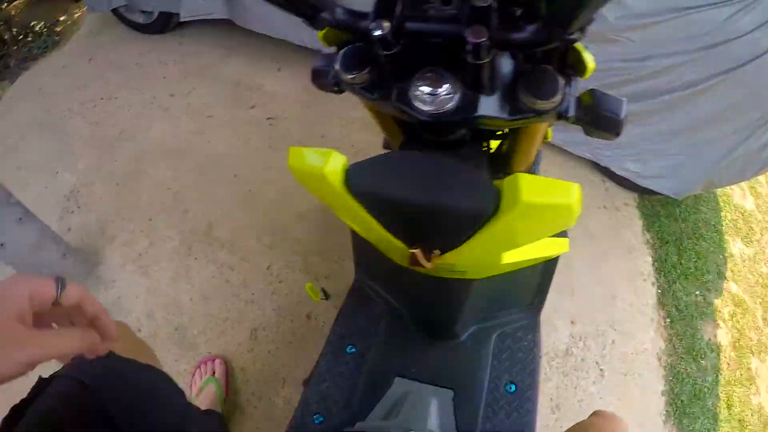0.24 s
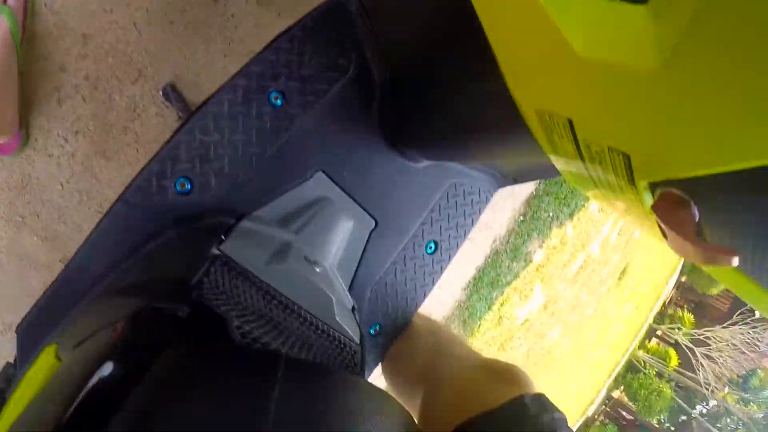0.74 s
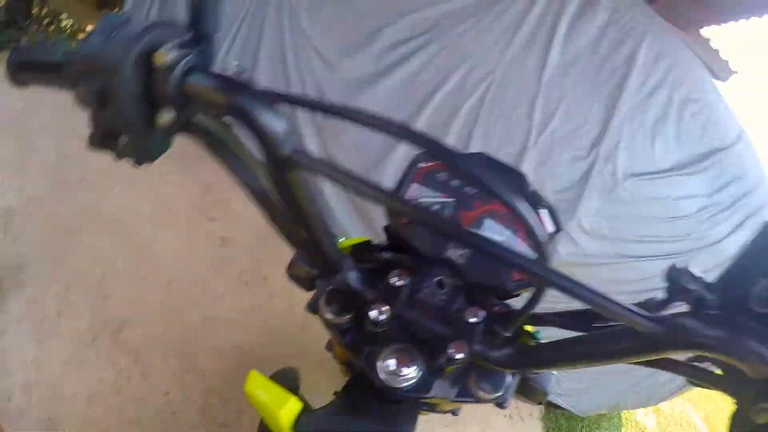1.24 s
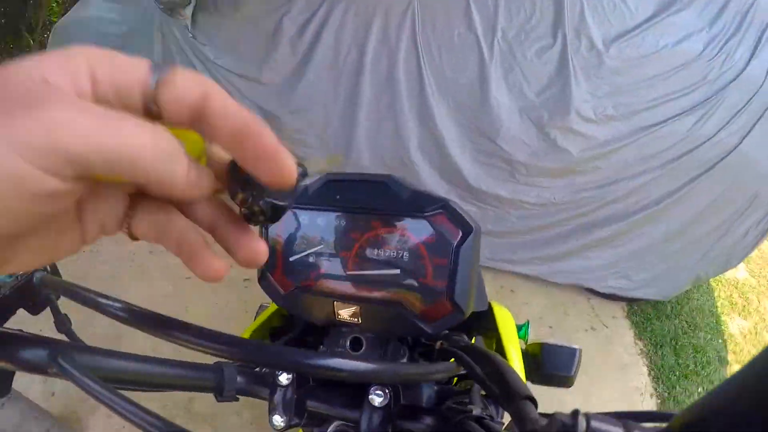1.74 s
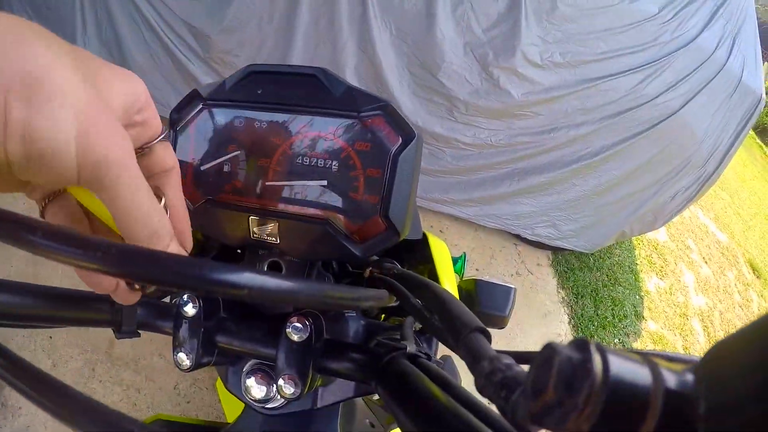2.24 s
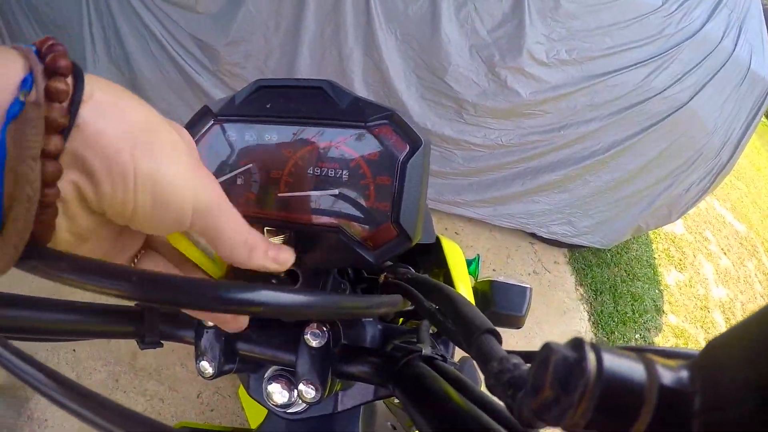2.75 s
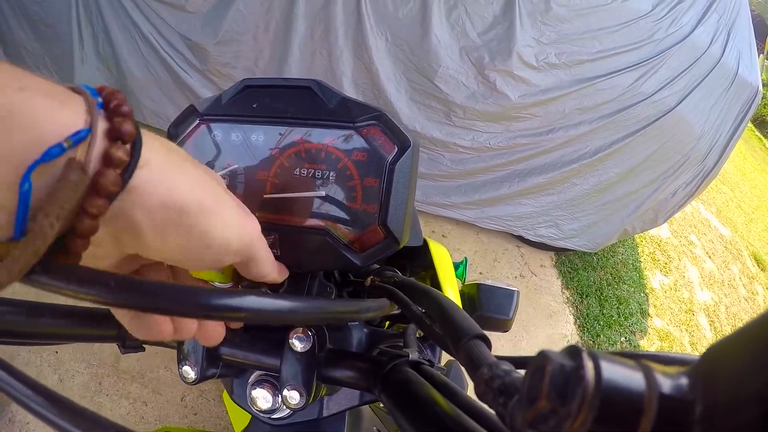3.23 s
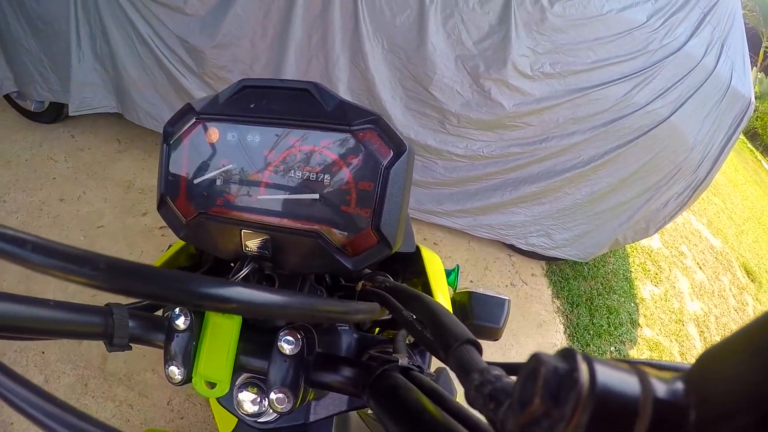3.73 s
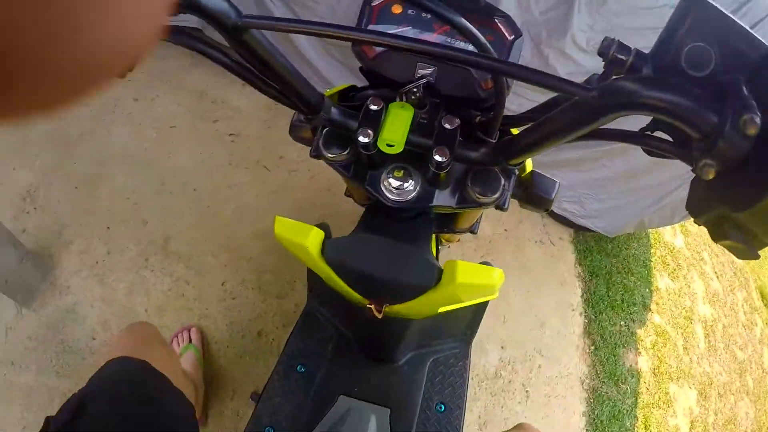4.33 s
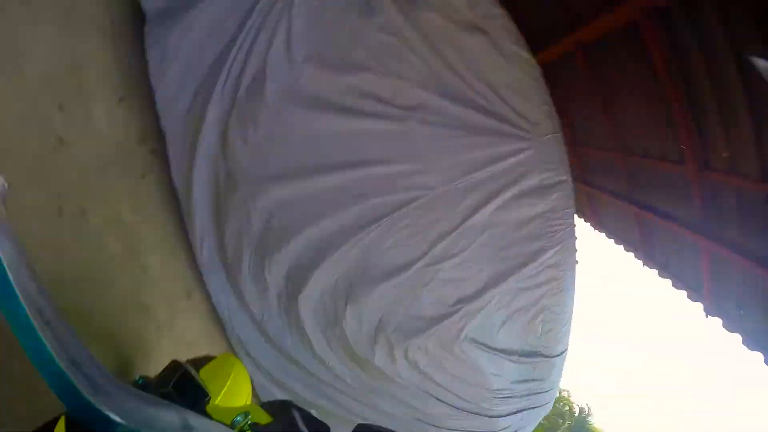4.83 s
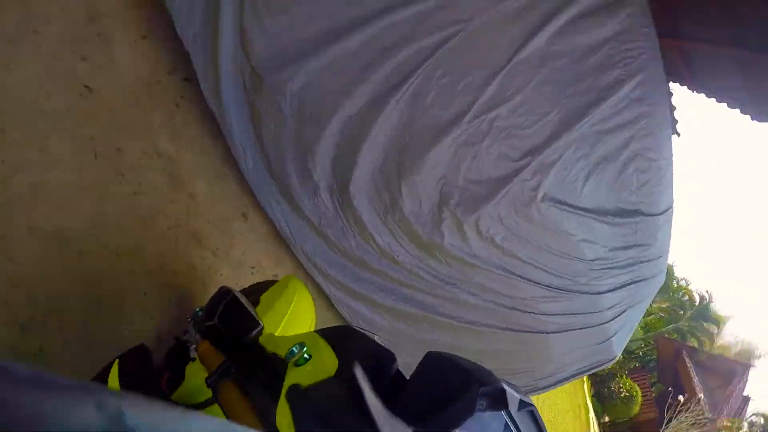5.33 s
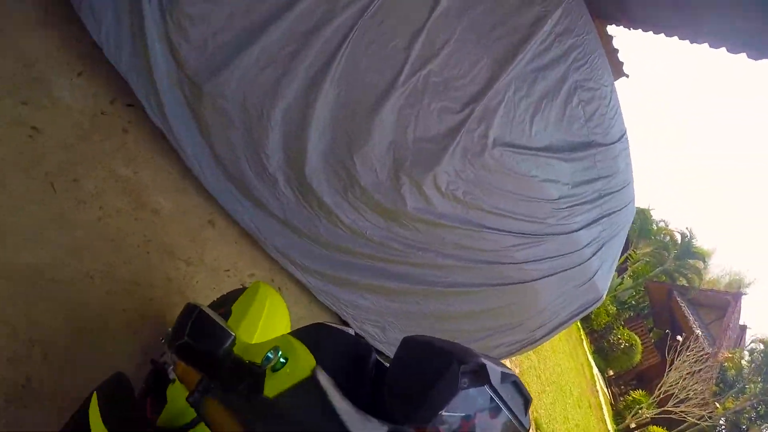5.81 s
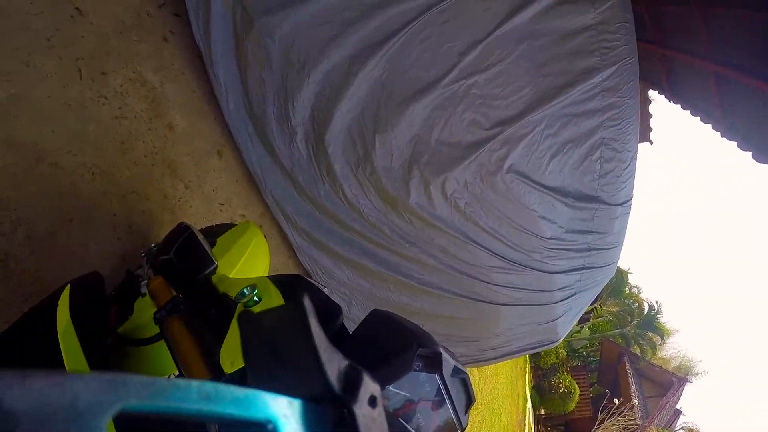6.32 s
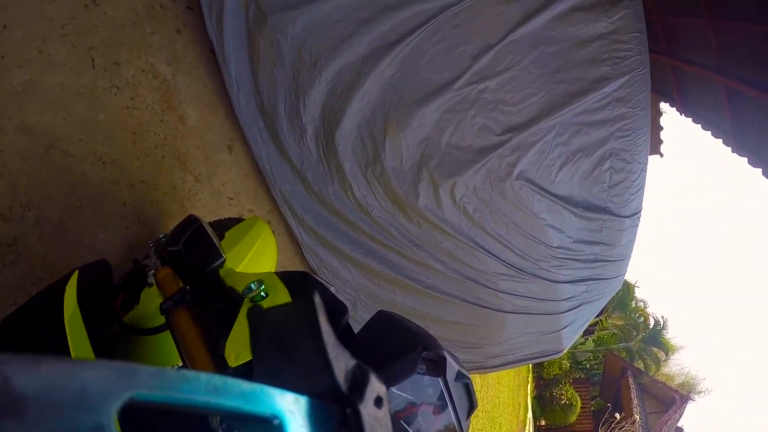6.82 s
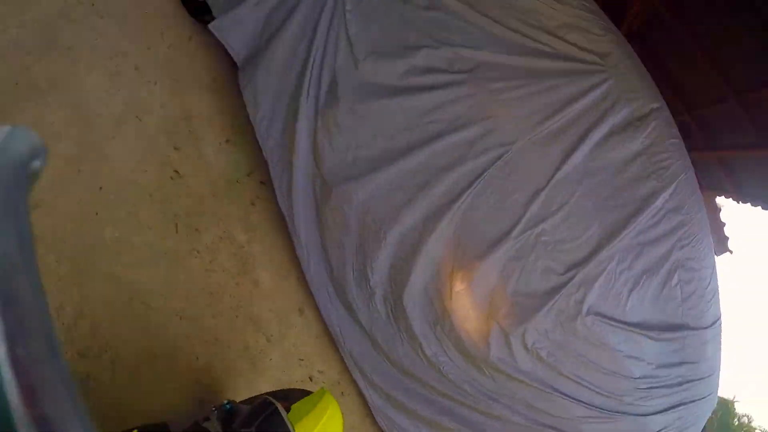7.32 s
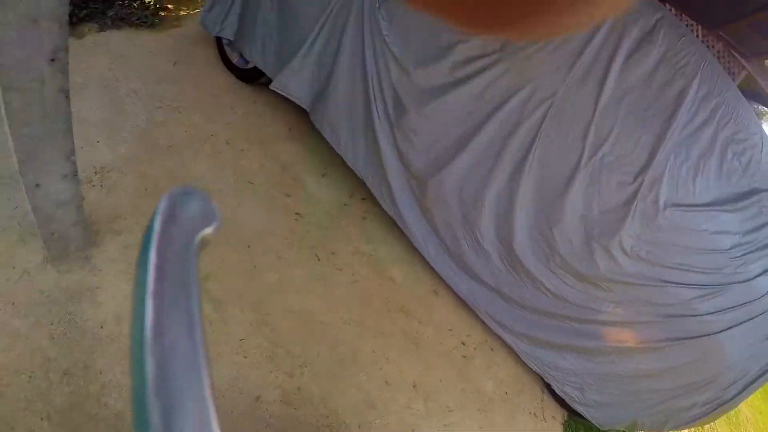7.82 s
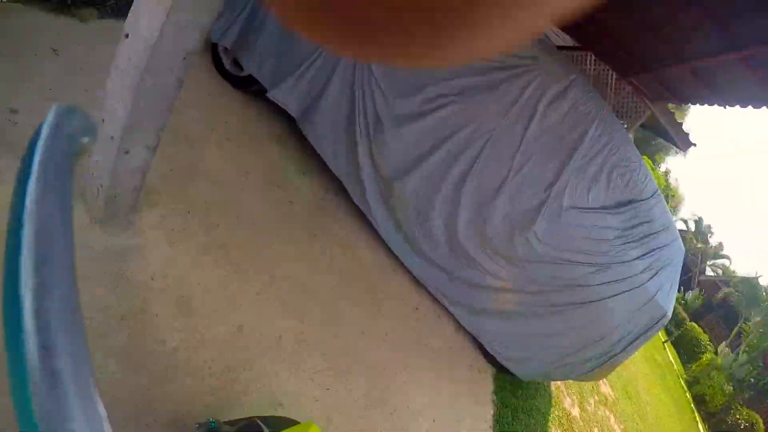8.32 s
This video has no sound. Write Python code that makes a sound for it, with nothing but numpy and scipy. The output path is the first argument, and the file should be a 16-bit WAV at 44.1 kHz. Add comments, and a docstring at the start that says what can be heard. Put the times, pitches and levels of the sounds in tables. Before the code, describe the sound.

In a quiet yard a parked motorbike's side stand snaps up with a brief metallic clack. Keys jingle thinly and click in the lock, followed by another light jingle. Then a hand grabs the body-worn camera: dry plastic ticks, short finger scrapes, dull low bumps and a light hissing slide, all very close, over swelling low rumble on the microphone.

```python
"""In a yard, a rider kicks up the side stand of a parked motorbike, engine off, and works a jingling key
into the lock; then a hand rubs, ticks, bumps and slides on the case of a small body-worn camera.
Impacts are decaying noise bursts in body spectra and resonances; keys also ring as damped sines.
Friction is noise with random slips and snags; bumps are short low-frequency pulses.
Air and movement rumble on the microphone, more strongly once the camera is held."""
import sys
import numpy as np
from scipy import signal
from scipy.fft import rfft, irfft, next_fast_len
from scipy.io import wavfile
from scipy.ndimage import uniform_filter1d

SR = 44100
rng = np.random.default_rng(int(sys.argv[2]) if len(sys.argv) > 2 else 0)


def pcm_store(signal):
    """Save signal as 16-bit PCM."""
    levels = np.round(np.clip(np.atleast_2d(signal), -1, 1) * 32767)
    wavfile.write(sys.argv[1], SR, levels.astype(np.int16).T)


N = 377496

# Table levels are relative: source gains and body resonances act on them afterwards.
# Side stand and footboard clack: start_s, level_db, bass_db, treble_db
STAND_HITS = [(0.0763, -46.5, -3, 11), (0.0837, -44.5, 7, -2), (0.0882, -40.5, -7.5, 3),
              (0.1488, -54.5, -1.5, -6), (0.1801, -61.5, -2, 1), (0.1983, -58, -9, -14),
              (0.2067, -62.5, -4, 1), (0.2263, -64, -5, -2), (0.7305, -62, -16, -11)]
# Key tapping at the lock and riding over its wafers: start_s, level_db, bass_db, treble_db
LOCK_CLICKS = [(1.8394, -45, 8, -7), (1.8643, -52, -2, -5), (1.8734, -49, -12, 7), (2.1499, -56.5, 2, 5),
               (2.276, -60, -17, 4), (2.3583, -62.5, 4, 0), (2.4411, -60.5, 5, -6), (2.5682, -58, 9, 11),
               (2.6287, -67.5, 7, -14), (2.6574, -58, -2, -2), (2.772, -61.5, 9, -2), (2.7983, -65.5, 6, 2),
               (3.1389, -53, 4.5, -3), (3.249, -63, 14.5, -2), (3.3725, -57.5, 1, -8),
               (3.4733, -51.5, 4.5, 6)]
# Keys touching on their ring, in three jingles: start_s, clink_level_db, ring_pitch_hz, ring_level_db
KEY_TOUCHES = [(0.3114, -58, 5770, -72), (0.325, -65, 13500, -64), (0.3667, -62.5, 14600, -70),
               (0.4185, -66.5, 8480, -76), (0.444, -71, 10100, -64), (0.8525, -62.5, 6140, -67),
               (0.9, -69, 5960, -62), (0.913, -71, 13440, -53), (3.567, -70.5, 10950, -76),
               (3.5984, -67, 11300, -65), (3.6327, -65.5, 13700, -83), (3.6514, -58, 4420, -71),
               (3.6629, -65, 10800, -60), (3.6796, -76, 6600, -76), (3.706, -70, 10700, -71)]
# Ticks of the camera case and mount: start_s, level_db, bass_db, treble_db
CASE_TICKS = [(1.37, -44, -12, -5), (1.4334, -46.5, -7.5, -6.5), (4.1721, -44, -12.5, -5),
              (4.273, -41, -6, -20), (4.3754, -42, -5, -19), (4.4796, -50.5, 2, -10),
              (4.7158, -41, -10, -1), (4.7336, -41, -9.5, -4), (4.9563, -38.5, -2, -14), (5.151, -56, 9, 2),
              (5.178, -52, 7, -33), (5.2111, -45.5, 5.5, -29), (5.237, -52, 19, 0), (5.2586, -49.5, 8, -10),
              (5.8414, -40, -6.5, 4), (7.29, -39.5, -19, 7), (7.3234, -32, -15.5, -2),
              (7.337, -34, -12.5, -12), (7.372, -50.5, -12, -5), (7.6238, -38, -10, -11),
              (7.689, -31.5, -10.5, -2), (7.724, -41, -12, 4), (7.9331, -45.5, 1.5, 3),
              (8.1314, -33, -5.5, 13), (8.1722, -50, -13, 8), (8.2396, -39.5, -12, -3)]
# Finger strokes on the case: start_s, length_s, level_db, treble_db
FINGER_STROKES = [(1.319, 0.1, -63, 3), (1.418, 0.16, -76, 8), (4.137, 0.028, -65, -4),
                  (4.254, 0.019, -51, 6), (4.275, 0.036, -48, 4), (4.364, 0.033, -44, 2),
                  (4.46, 0.24, -56, -7), (4.566, 0.064, -43, -3), (4.643, 0.037, -55, 1),
                  (4.73, 0.049, -46.5, 7), (4.785, 0.052, -60, 11), (4.953, 0.066, -54.5, 9),
                  (5.013, .03, -46.5, 3), (5.144, 0.022, -58, 6), (5.216, 0.026, -62, 2),
                  (5.308, 0.0091, -58.5, 4), (5.389, 0.091, -58, 7.5), (5.532, 0.02, -63, -1),
                  (5.575, 0.038, -59, -1), (5.843, 0.036, -43.5, -5.5), (5.883, 0.1, -61, -9),
                  (6.059, 0.074, -58, -5), (6.138, 0.11, -61.5, -1.5), (7.207, 0.024, -32, 3),
                  (7.266, .026, -68, -14), (7.298, 0.05, -56, 2), (7.438, 0.033, -44, 2),
                  (7.482, 0.026, -47, 13), (7.565, .052, -48, 9), (7.655, 0.054, -54, -9),
                  (7.777, 0.024, -53, 8), (7.912, 0.06, -55.5, -7), (8.108, 0.03, -52, -5),
                  (8.234, 0.032, -49, 7), (8.297, 0.061, -45.5, 0.5), (8.37, 0.062, -49.5, 2.5)]
# Soft bumps on the camera: start_s, level_db, pitch_hz
SOFT_BUMPS = [(1.365, -44, 87), (1.435, -39, 54.4), (1.74, -35.5, 51.3), (1.916, -41.5, 56),
              (2.772, -54, 121), (3.172, -49, 86), (4.277, -32, 67), (4.304, -33, 76), (4.573, -31.5, 139),
              (4.715, -27.5, 122), (4.735, -32.5, 75), (5.002, -21, 94), (5.019, -20, 85),
              (5.077, -38, 131), (5.857, -30.5, 75), (5.964, -26, 79), (6.081, -27, 86),
              (6.112, -27.5, 83.5), (6.168, -24, 99), (6.877, -23, 66.4), (7.173, -27, 85),
              (7.29, -22.5, 81), (7.726, -29.5, 109), (8.028, -30.5, 98), (8.179, -21, 111),
              (8.321, -25.5, 73)]
# Harder fingertip knocks, a softer contact having a lower edge: start_s, peak_db, edge_hz
FINGER_KNOCKS = [(4.4633, -45, 1490), (5.386, -46.5, 2170), (5.966, -42.5, 1740), (6.062, -49, 910),
                 (6.0801, -32, 705), (6.168, -38, 1820), (6.891, -44.5, 900), (7.175, -37, 2260),
                 (8.077, -44, 2200), (8.2902, -38, 1820)]
# One long, light slide, then moments of firm pressure that replace its level: start_s, length_s, level_db
SLIDE_PRESSURE = [(6.402, 0.85, -62), (6.399, 0.038, -48), (6.461, .11, -51), (6.598, 0.091, -52.5),
                  (6.741, 0.048, -50), (7.152, 0.046, -48)]
# Air and movement on the microphone: time_s, level_db
MOVEMENT_LEVEL = [(0.0, -51), (0.16, -62), (1.02, -63.5), (1.64, -56), (2.17, -65.5), (2.93, -68),
                  (3.86, -64.5), (4.43, -48), (4.89, -49.5), (5.6, -56.5), (5.87, -52.5), (6.05, -40.5),
                  (6.56, -50), (6.79, -44), (7.01, -33.5), (7.41, -47.5), (8.34, -43.5), (8.56, -41)]
# Light, constant friction of the holding hand: time_s, level_db
GRIP_LEVEL = [(1.1, -89), (1.35, -78.5), (1.6, -92), (4.0, -91), (4.5, -69), (4.9, -75.5), (5.7, -79),
              (6.3, -85.5), (7.2, -64.5), (7.4, -72), (8.1, -66.5), (8.56, -70.5)]

# Spectra of the struck and rubbed bodies, and of the air: frequency_hz, gain_db
STAND_SPECTRUM = [(200, -16), (470, -5.5), (800, 2), (1300, -0.5), (1700, -7.5), (2300, -7.5), (3000, -7.5),
                  (4200, -4), (6000, -8.5), (8500, -18.5), (11000, -21.5), (15000, -21.5)]
LOCK_SPECTRUM = [(200, -33), (700, -18), (1000, -17.5), (1400, -8.5), (1800, -9.5), (2500, -1), (3300, 1),
                 (4500, 9), (6800, -3.5), (8500, -0.5), (11000, -4.5), (15000, -8.5)]
KEY_SPECTRUM = [(200, -23), (2000, -21), (4000, -1), (5200, -2), (6500, 0), (9500, -7), (11000, -3),
                (12300, -11), (15000, -10)]
TICK_SPECTRUM = [(200, 15.5), (600, -4.5), (1100, -5), (1700, 3), (2800, -8.5), (4000, -3.5), (5200, 0),
                 (6500, -10), (8200, -14), (10000, -16.5), (12500, -23), (15000, -15.5)]
RUB_SPECTRUM = [(200, 16.5), (600, -4), (1100, -4.5), (1800, 2), (2800, 1), (3600, 4.5), (4800, 3.5),
                (6500, 1.5), (8200, -7), (9800, -7), (11200, -6.5), (12700, -7.5), (15000, -9)]
SLIDE_SPECTRUM = [(300, -32), (950, -9), (1300, -17.5), (2200, -7), (3000, -9), (3400, 1), (4200, -6.5),
                  (5700, -1), (6000, 2.5), (7200, 1), (7900, -13.5), (8600, -8), (9900, -15), (15500, -19)]
GRIP_SPECTRUM = [(300, -21.5), (900, -11.5), (2200, -5), (2900, -4.5), (3500, 4.5), (4500, -4.5),
                 (6700, -3), (9500, -16.5), (15500, -16)]
KNOCK_SPECTRUM = [(40, -28.5), (150, -4.5), (330, 4.5), (620, 0), (900, -5), (1600, -5), (3000, 0.5)]
RUMBLE_SPECTRUM = [(15, -11), (35, 1), (55, 3.5), (80, -0.5), (120, -11.5), (180, -23), (300, -36),
                   (600, -63), (1300, -78.5)]
YARD_SPECTRUM = [(40, -21.5), (75, -3.5), (130, -18.5), (296, -25), (650, -31.5), (1270, -35), (1830, -38),
                 (4550, -40), (13500, -42), (16000, -48)]

# Resonances of the lock barrel, the camera case and the side stand: pitch_hz, width_hz, gain_db
LOCK_RESONANCES = [(1343, 160, 7), (2030, 160, 5), (2550, 110, 7.5), (4280, 100, -31), (6850, 180, 11)]
CASE_RESONANCES = [(1870, 190, -7), (2330, 490, -8), (3616, 190, -16.5), (4490, 300, -12), (5180, 180, -15),
                   (6010, 87, -5), (7150, 67, 1), (8400, 420, 2.5), (11100, 100, 1)]
STAND_RESONANCES = [(1740, 370, 7), (4000, 200, 3), (5600, 200, -8), (6850, 350, 4), (8600, 450, 5.5),
                    (11100, 350, -3)]

# Anchors of the tonal lean, for bass, middle and treble: frequency_hz
LEAN_HZ = (1300, 4700, 12000)


def from_db(db):
    """Decibel law: an amplitude ratio is ten to the power of dB over twenty."""
    return 10 ** (np.asarray(db) / 20)


def rms_one(x):
    """Power normalisation: scale the root mean square to one."""
    return x / np.sqrt(np.mean(x ** 2) + 1e-20)


def seconds(length):
    """Sampled time: the instants, in seconds, of a given length."""
    return np.arange(int(length * SR)) / SR


def level(rows):
    """Envelope: gain over the whole scene, interpolated in decibels between (time_s, level_db) rows."""
    times, levels_db = np.transpose(rows)
    return from_db(np.interp(np.arange(N) / SR, times, levels_db))


def add(out, start_s, sound):
    """Superposition: sum a sound into the mix from its starting time."""
    at = max(0, int(start_s * SR))
    out[at:at + len(sound)] += sound[:max(0, N - at)]


def flutter(n, knots_hz):
    """Random modulation: straight lines between normal random values, knots_hz of them a second."""
    knots = rng.standard_normal(2048)
    position = np.arange(n) * knots_hz / SR % 2047
    return np.interp(position, np.arange(2048), knots)


def colour(x, spectrum, bass_db=0, treble_db=0):
    """Minimum-phase filtering: a causal body response follows from its log spectrum by the cepstrum."""
    n = 2 * next_fast_len(len(x) // 2 + 512)
    log_hz = np.log(np.arange(n // 2 + 1) * SR / n + 1)
    spectrum_hz, spectrum_db = np.transpose(spectrum)
    body_db = np.interp(log_hz, np.log(spectrum_hz), spectrum_db)
    lean_db = np.interp(log_hz, np.log(LEAN_HZ), [bass_db, 0, treble_db])
    cepstrum = irfft(np.log(from_db(body_db + lean_db)))
    # fold the cepstrum onto positive time
    cepstrum[1:n // 2] *= 2
    cepstrum[n // 2 + 1:] = 0
    response = np.exp(rfft(cepstrum))
    return irfft(rfft(x, n) * response)[:len(x)]


def resonate(x, modes):
    """Modal resonance: add to x the response of two-pole resonators whose damping sets their width."""
    out = x.copy()
    for pitch_hz, width_hz, gain_db in modes:
        r = np.exp(-np.pi * width_hz / SR)
        poles = [1, -2 * r * np.cos(2 * np.pi * pitch_hz / SR), r * r]
        ringing = signal.lfilter([1, 0, -1], poles, x + 1e-18)
        out += from_db(gain_db) * (1 - r * r) / 2 * ringing
    return out


def strikes(table, spectrum, crack_t60, tail_db, tail_t60, space_db, space_t60):
    """Impact: a crack, a ring of dense body modes and faint scatter from the surroundings (t60 in s)."""
    out, t = np.zeros(N), seconds(.3)
    crack = from_db(-60 * t / crack_t60)
    tail = from_db(tail_db - 60 * t / tail_t60)
    scatter = from_db(space_db - 60 * t / space_t60)
    decay = crack + tail + scatter
    for start_s, level_db, bass_db, treble_db in table:
        hit = colour(rng.standard_normal(len(t)) * decay, spectrum, bass_db, treble_db)
        attack = np.std(hit[t < .004])  # the level refers to the first 4 ms
        add(out, start_s, from_db(level_db) * hit / attack)
    return out


def snags(n, per_s, range_db):
    """Random point process: lone catches of either sign, their sizes reaching range_db below one."""
    caught = rng.random(n) < per_s / SR
    size = from_db(range_db * rng.uniform(-1, 0, n))
    return caught * size * rng.choice([-1, 1], n)


def friction(n, grain_db, slip_db, slip_hz, snag_per_s, snag_db):
    """Stick-slip: countless tiny slips, bunched as the skin sticks and lets go, with larger snags."""
    grain = from_db(grain_db * rng.standard_normal(n))
    slips = rms_one(rng.standard_normal(n) * grain)
    bunching = from_db(slip_db * flutter(n, slip_hz))
    return slips * bunching + from_db(snag_db) * snags(n, snag_per_s, range_db=19.8)


def air():
    """Pressure fluctuation: lumpy rumble on the microphone port over the quiet hiss of the yard."""
    rumble = rms_one(colour(rng.standard_normal(N), RUMBLE_SPECTRUM))
    # evened over 5000 samples, so that movement sets its level
    rumble /= np.sqrt(uniform_filter1d(rumble ** 2, size=5000) + 1e-6)
    yard = rms_one(colour(rng.standard_normal(N), YARD_SPECTRUM))
    return from_db(4.0) * level(MOVEMENT_LEVEL) * rumble + from_db(-73) * yard


def movement_stutter(edge_hz=650):
    """Intermittent contact: low-passed snags stutter under the finger pads, following the movement."""
    low_pass = signal.butter(2, edge_hz, fs=SR, output="sos")
    slips = signal.sosfilt(low_pass, snags(N, per_s=45, range_db=13.75) + 1e-18)
    return from_db(-30.5) * level(MOVEMENT_LEVEL) * rms_one(colour(slips, KNOCK_SPECTRUM))


def holding_hand(creak_db=1, creaks_per_s=26):
    """Sustained friction: skin and cloth whisper on the case, and the gripped plastic gives small ticks."""
    slips = friction(N, grain_db=5.0, slip_db=4.0, slip_hz=41.9, snag_per_s=45, snag_db=29.0)
    whisper = rms_one(colour(slips, GRIP_SPECTRUM))
    creaks = colour(snags(N, creaks_per_s, range_db=16.5), TICK_SPECTRUM, bass_db=-6.5, treble_db=5)
    return level(GRIP_LEVEL) * (from_db(-1.5) * whisper + from_db(creak_db) * rms_one(creaks))


def side_stand():
    """Impact on a resonant body: the stand springs up and rebounds, exciting its metal modes."""
    hits = strikes(STAND_HITS, STAND_SPECTRUM, crack_t60=0.013, tail_db=-7.5, tail_t60=0.047,
                   space_db=-31, space_t60=0.48)
    return from_db(4.5) * resonate(hits, STAND_RESONANCES)


def keys(ring_t60=0.051, chatter_min_s=0.005005, chatter_max_s=0.01911, chatter_db=-7, partner_db=1,
         firm_clink_db=-62.5, thinning=2.1):
    """Free vibration: each touch clinks, chatters once and leaves flat keys ringing as damped sines."""
    touches, rebounds = [], []
    for start_s, clink_db, _, _ in KEY_TOUCHES:
        # lighter touches are thinner: dB of treble gained per dB under a firm clink
        treble_db = thinning * (firm_clink_db - clink_db)
        touches.append((start_s, clink_db, 0, treble_db))
        rebound_s = start_s + rng.uniform(chatter_min_s, chatter_max_s)
        rebounds.append((rebound_s, clink_db + chatter_db, 0, treble_db))
    out = strikes(touches + rebounds, KEY_SPECTRUM, crack_t60=0.0038, tail_db=-29, tail_t60=0.04,
                  space_db=-18, space_t60=0.19)
    t = seconds(.3)
    pitches_hz = np.array(KEY_TOUCHES)[:, 2]
    for start_s, clink_db, pitch_hz, ring_db in KEY_TOUCHES:
        # five partners near the pitches of the other touches, averaged
        partner_hz = rng.choice(pitches_hz, size=5)[:, None] * rng.uniform(.9, 1.1, (5, 1))
        partners = np.sin(2 * np.pi * partner_hz * t).mean(axis=0)
        main_ring = from_db(ring_db) * np.sin(2 * np.pi * pitch_hz * t)
        ringing = main_ring + from_db(clink_db + partner_db) * partners
        add(out, start_s, ringing * from_db(-60 * t / ring_t60))
    return out


def finger_rubs(start_db=-7, end_db=-12, edge_s=0.0084, bass_db=1.5, swell_share=0.49,
                squeak_hz=7700, squeak_width_hz=1100, squeak_from_db=-47.5, squeak_growth=1.28):
    """Dry friction: strokes swell and ease with pressure; hard-pressed skin adds a hoarse squeak."""
    out, t = np.zeros(N), seconds(.16)
    for start_s, length_s, level_db, treble_db in FINGER_STROKES:
        # the pressure rises over swell_share of the stroke
        pressure = from_db(np.interp(t / length_s, [0, swell_share, 1], [start_db, 0, end_db]))
        # contact opens at half and is full after half of edge_s
        contact = np.clip(np.minimum(t, length_s - t) / edge_s + .5, 0, 1)
        slips = friction(len(t), grain_db=6, slip_db=4.5, slip_hz=181.4, snag_per_s=76, snag_db=13.0)
        # every spot on the case favours a few resonances of its own
        spot = [(pitch_hz, 220, 0) for pitch_hz in rng.uniform(2000, 15000, size=6)]
        # squeak gain grows by squeak_growth dB per dB of stroke and is 0 dB at squeak_from_db
        squeak = (squeak_hz, squeak_width_hz, squeak_growth * (level_db - squeak_from_db))
        scrape = resonate(colour(slips, RUB_SPECTRUM, bass_db, treble_db), spot + [squeak])
        add(out, start_s, from_db(level_db) * pressure * contact * rms_one(scrape))
    return out


def case_ticks(creep_db=-17, creep_s=0.0039):
    """Stress release: plastic creeps under the finger, then lets go with a short, dry tick."""
    out = strikes(CASE_TICKS, TICK_SPECTRUM, crack_t60=0.0049, tail_db=-14, tail_t60=0.021,
                  space_db=-42, space_t60=0.059)
    t = seconds(.04)
    growth = np.exp((t - t[-1]) / creep_s)
    for start_s, level_db, bass_db, treble_db in CASE_TICKS:
        creep = rms_one(colour(rng.standard_normal(len(t)), TICK_SPECTRUM, bass_db, treble_db))
        add(out, start_s - t[-1], from_db(level_db + creep_db) * creep * growth)
    return from_db(-0.44) * out


def bumps(rise_cycles=0.36, sharpness=1.54):
    """Air displacement: a bump pushes air at the microphone port in and out for a cycle or two."""
    out, t = np.zeros(N), seconds(.1)
    for start_s, level_db, pitch_hz in SOFT_BUMPS:
        age = t * pitch_hz / rise_cycles
        swell = (age * np.exp(1 - age)) ** sharpness
        add(out, start_s, from_db(level_db + 2.0) * swell * np.sin(2 * np.pi * pitch_hz * t))
    return out


def knocks(bump_knock_db=-26.5, bump_edge_hz=414):
    """Soft impact: a yielding finger pad low-passes its knock; bumps also knock faintly through the case."""
    out, push = np.zeros(N), signal.unit_impulse(2048)
    soft = [(start_s, level_db + bump_knock_db, bump_edge_hz) for start_s, level_db, _ in SOFT_BUMPS]
    for start_s, peak_db, edge_hz in FINGER_KNOCKS + soft:
        low_pass = signal.butter(4, edge_hz, fs=SR, output="sos")
        knock = colour(signal.sosfilt(low_pass, push), KNOCK_SPECTRUM)
        add(out, start_s, from_db(peak_db) * knock / np.abs(knock).max())
    return out


def key_in_lock():
    """Impact in a small barrel: the key clicks its way into the lock, exciting the barrel's modes."""
    clicks = strikes(LOCK_CLICKS, LOCK_SPECTRUM, crack_t60=0.012, tail_db=-2, tail_t60=0.04,
                     space_db=-29.5, space_t60=0.34)
    return from_db(-3.5) * resonate(clicks, LOCK_RESONANCES)


def long_slide(ease_s=0.015):
    """Sliding friction: a steady slide hisses on the case, louder wherever the finger presses."""
    pressure, t = np.zeros(N), np.arange(N) / SR
    for start_s, length_s, level_db in SLIDE_PRESSURE:
        pressure[(t >= start_s) & (t < start_s + length_s)] = from_db(level_db)
    slips = friction(N, grain_db=2.0, slip_db=1.34, slip_hz=178, snag_per_s=50, snag_db=17)
    scrape = rms_one(colour(slips, SLIDE_SPECTRUM))
    return uniform_filter1d(pressure, int(ease_s * SR)) * scrape


def scene():
    """Superposition: bike and keys at arm's length, the hand on the camera's resonant case, and the air."""
    touched = holding_hand() + finger_rubs() + case_ticks() + long_slide()
    case = from_db(-0.94) * resonate(touched, CASE_RESONANCES)
    bike = side_stand() + keys() + key_in_lock()
    contact = movement_stutter() + bumps() + knocks()
    return (air() + bike + case + contact)[None]


def record(dry):
    """Band limiting: the camera cuts the top steeply, with an elliptic low-pass at 15900 Hz."""
    low_pass = signal.ellip(10, .1, 80, 15900, fs=SR, output="sos")
    return signal.sosfilt(low_pass, dry)


dry = scene()
out = record(dry)
pcm_store(out)
```